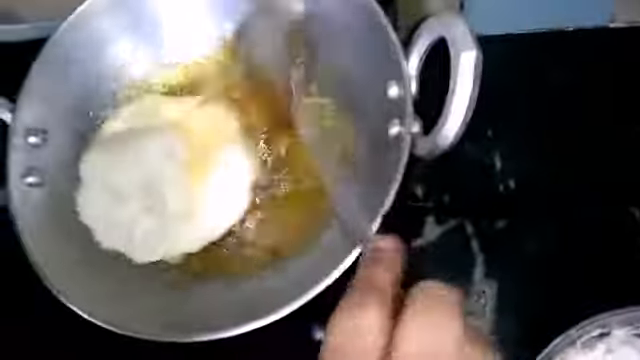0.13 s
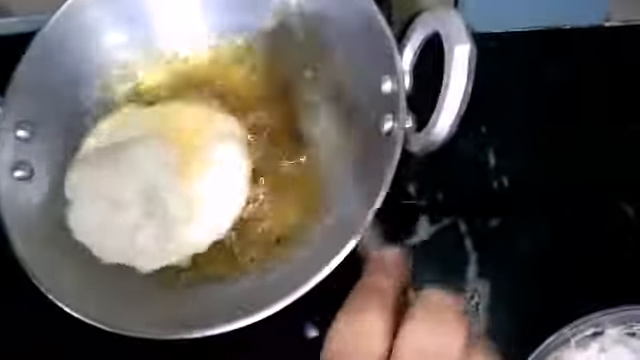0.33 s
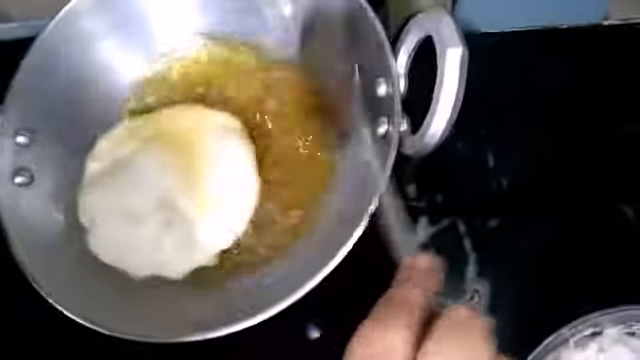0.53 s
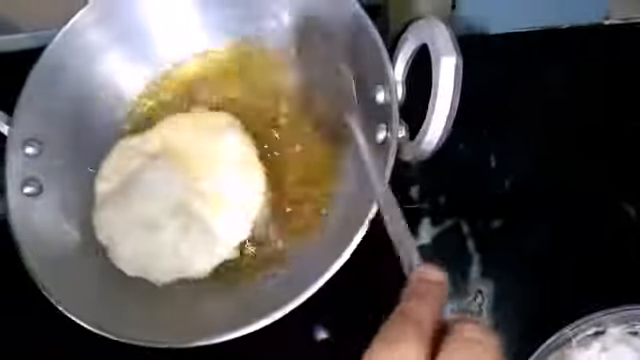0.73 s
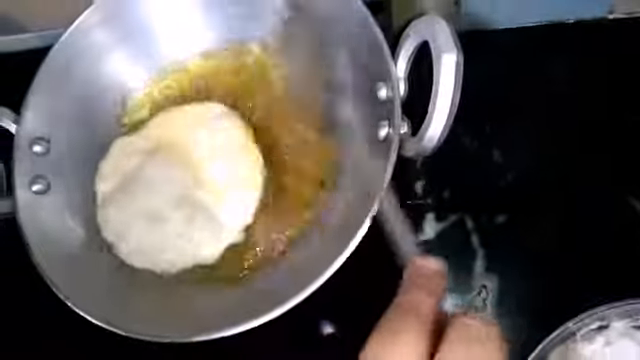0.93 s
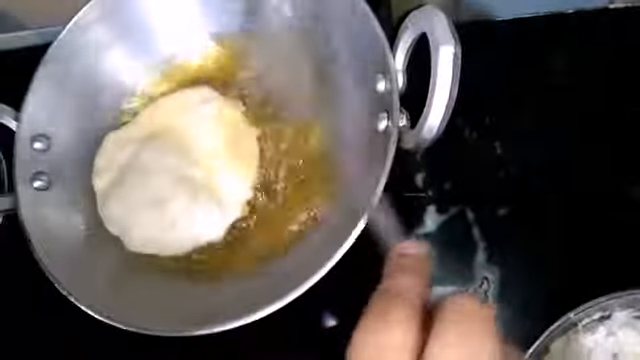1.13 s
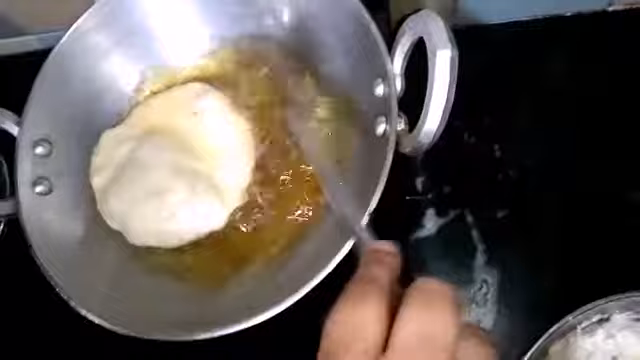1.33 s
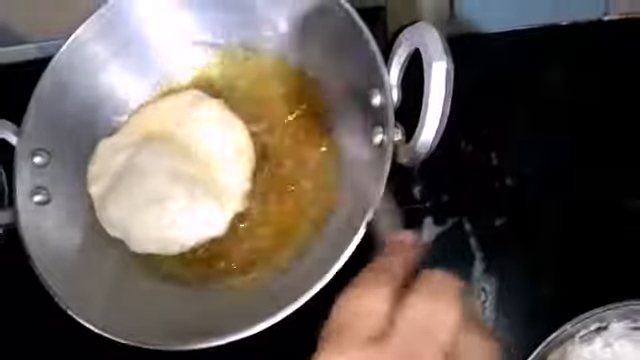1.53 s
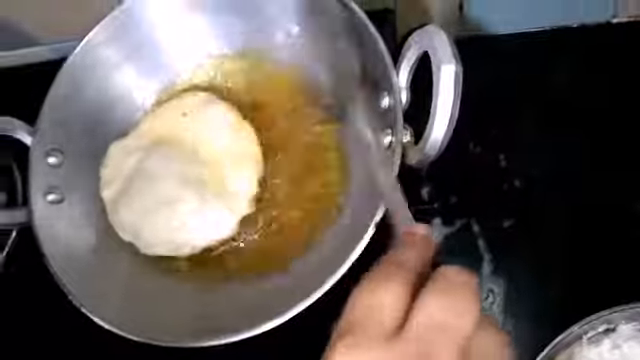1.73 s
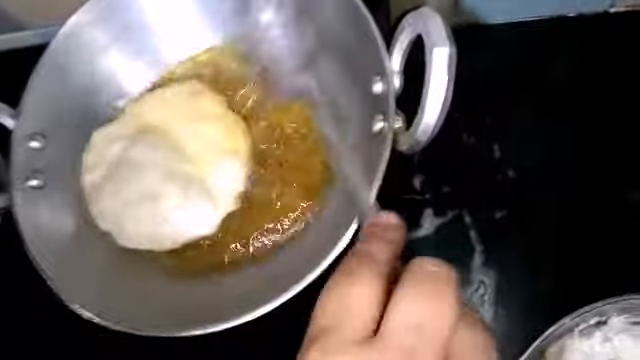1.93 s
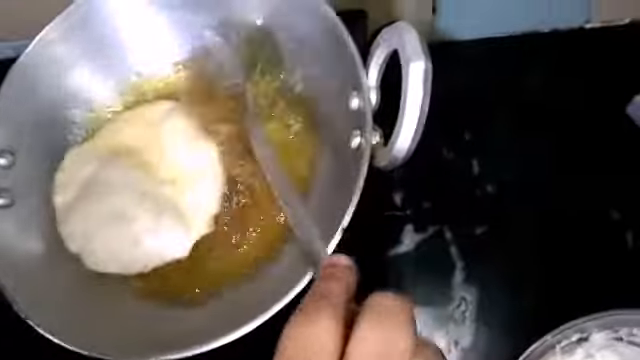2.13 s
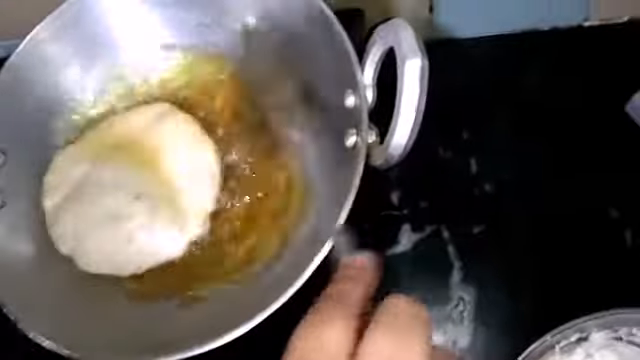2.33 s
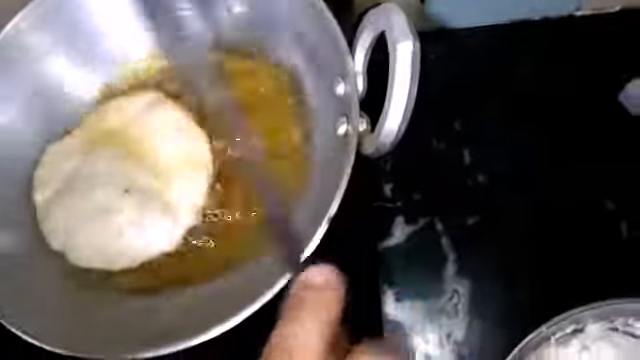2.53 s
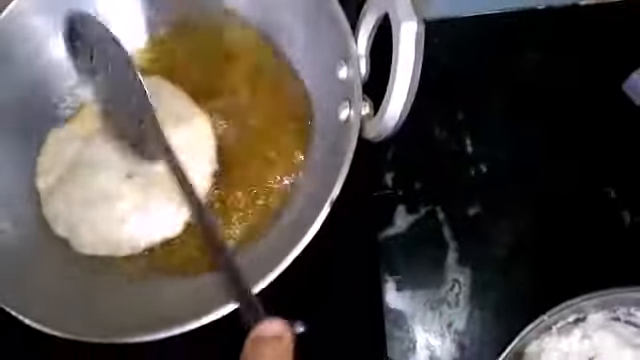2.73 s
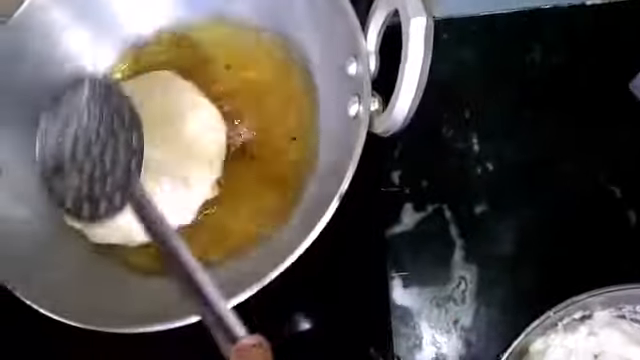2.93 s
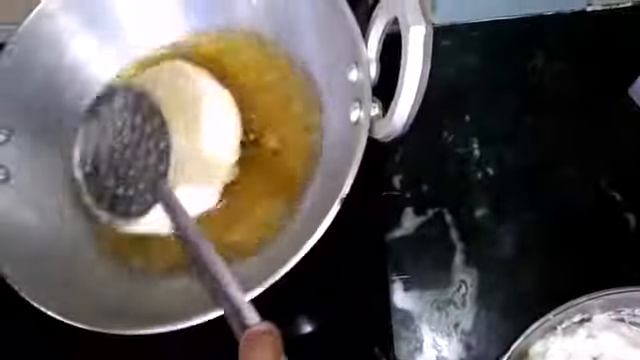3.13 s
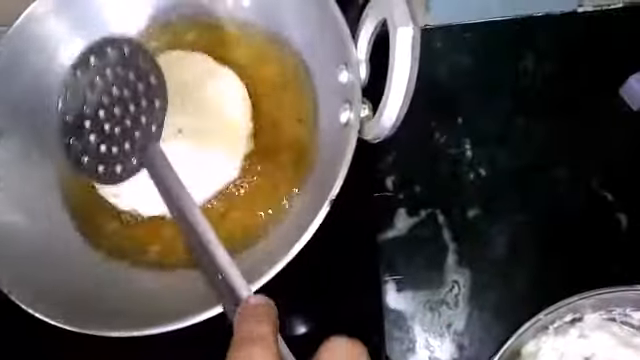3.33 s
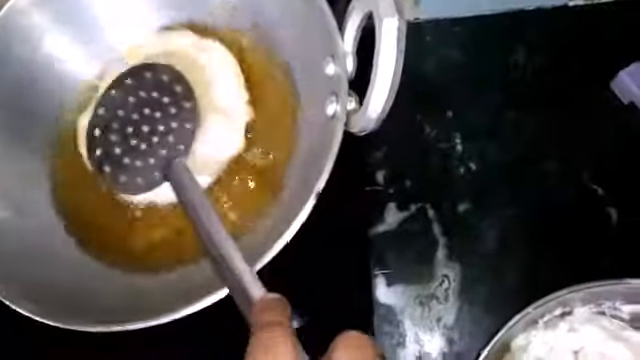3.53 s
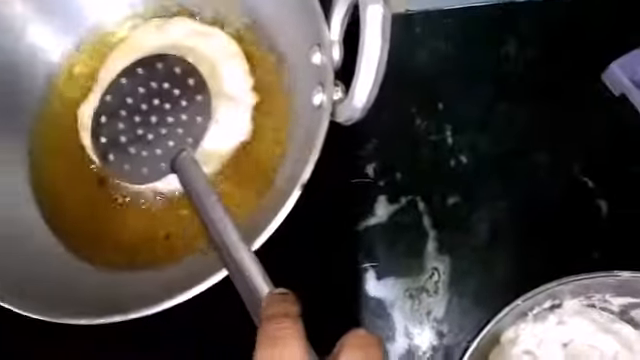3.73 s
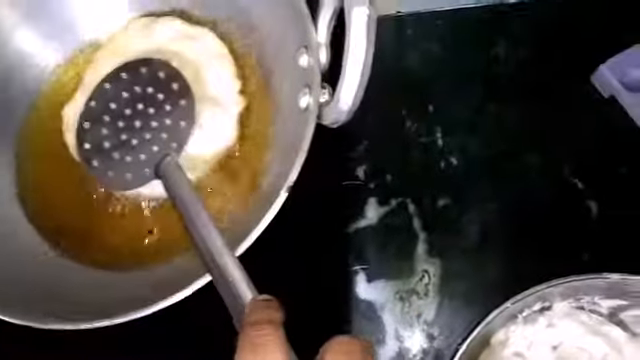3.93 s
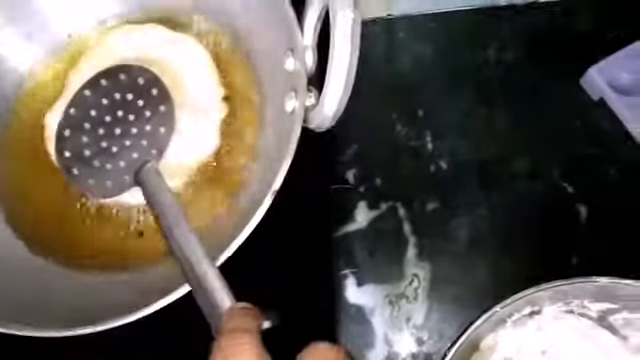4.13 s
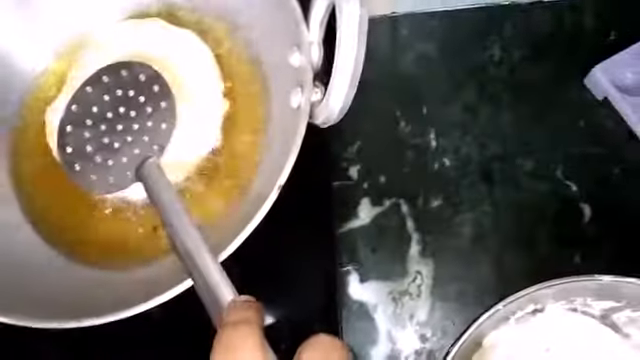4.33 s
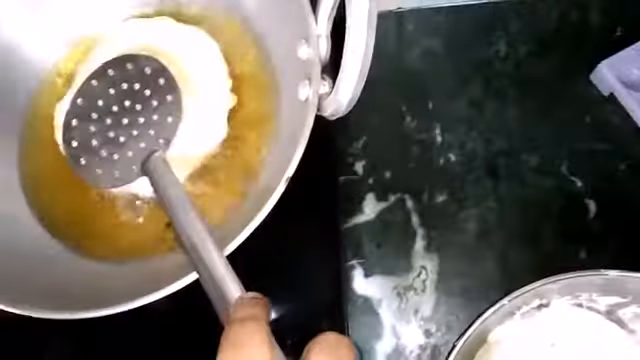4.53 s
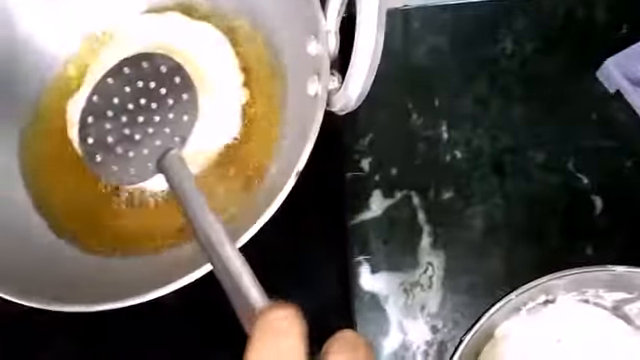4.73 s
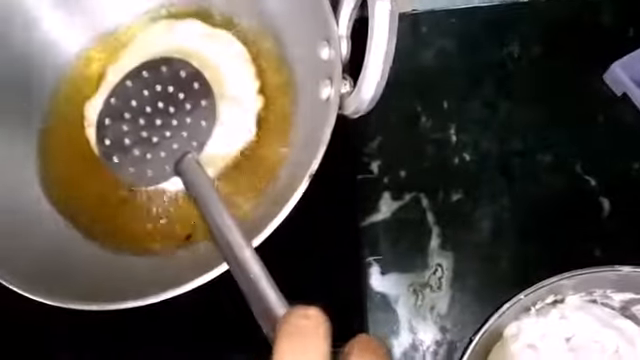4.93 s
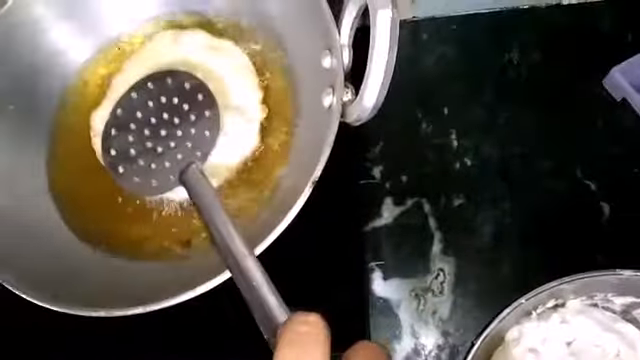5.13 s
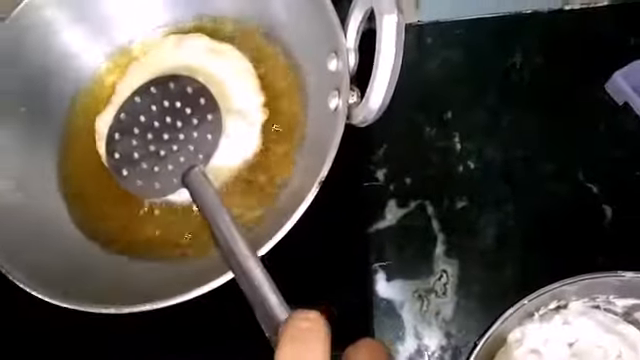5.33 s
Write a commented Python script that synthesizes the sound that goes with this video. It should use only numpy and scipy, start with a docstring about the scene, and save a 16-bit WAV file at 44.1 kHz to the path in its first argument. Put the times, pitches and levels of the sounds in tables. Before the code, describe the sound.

Close to a stove in a small kitchen, a steel skimmer raps the wall of a metal pan nine times, four a second, each clattery knock briefly ringing. Lively oil bubbles, fizzes and pops around the strokes, with tiny droplet plips. After a sharp tick the knocking stops, the sloshing fades and a calmer sizzle goes on with spits and soft gurgles. Close single-channel pickup, short hard reflections.

```python
"""A small kitchen, close to the stove: dough fries in a metal pan of hot oil.
A steel skimmer knocks nine times on the pan wall as it flicks oil at the dough, then holds the dough down.
Each knock is shaped noise plus ringing pan modes; pops and droplets are short noise puffs, and the sizzle
is swarms of tiny decaying pings over noise. Gurgles, a rumble, a low hum and a faint higher tone lie below."""
import sys
import numpy as np
from scipy import signal
from scipy.fft import rfft, irfft
from scipy.io import wavfile

SR = 44100
rng = np.random.default_rng(int(sys.argv[2]) if len(sys.argv) > 2 else 0)


def wav_out(sig):
    """Save sig, one row per channel (or a flat mono array), as 16-bit PCM at SR to the path in sys.argv[1]."""
    wavfile.write(sys.argv[1], SR, np.round(np.clip(np.atleast_2d(sig).T, -1, 1) * 32767).astype(np.int16))


N = 240812
TIME = np.arange(N) / SR  # s

# Skimmer blows on the pan wall: start_s, level_db (before the final trim), low_ring_hz, low_ring_lift_db,
# low_ring_width_octaves, high_ring_lift_db, thud_db, rebound_delay_s, rebound_db, first_mode_hz, second_mode_hz
SKIMMER_BLOWS = [(0.1722, -30.5, 1950, 8.5, 0.3, -5, 1, 0.01, -0.5, 1720, 2130),
                 (0.4312, -26, 2700, 5, 0.54, -1, -0.5, 0.018, -2.5, 2567, 5414),
                 (0.6808, -25.5, 2780, 8, 0.26, 1, -2, 0.012, -1.5, 2567, 3098),
                 (0.9146, -24.5, 1590, 10.5, 0.43, 3.5, 2.5, 0.03, -15, 1664, 1875),
                 (1.1638, -30, 1910, 12.5, 0.13, -1, -11, 0.0038, -9, 1875, 2130),
                 (1.4064, -25, 3040, 9.5, 0.13, 2.5, -2.5, 0.013, -3.5, 5090, 6265),
                 (1.6542, -21.5, 2280, 7.5, 0.1, 8, -13.5, 0.0017, -3, 5090, 7645),
                 (1.9233, -26, 1820, 8.5, 0.41, 1, -9.5, 0.0067, 1, 1875, 2234),
                 (2.2024, -27, 2360, 4.5, 0.44, 1.5, -3, 0.0059, -3, 2567, 5414)]


def skimmer():
    """Nine even strokes of steel on the pan wall, four a second."""
    out = np.zeros(N)
    for start_s, *blow in SKIMMER_BLOWS:
        add(out, start_s, knock(*blow))
    return amp(-1.0) * out


# Ringing modes of the pan, before each blow varies them: pitch_hz, level_db (relative), t60_s
PAN_MODES = [(1579, -8, .2), (1664, -7, .2), (1748, -7, .2), (1875, -10, .18), (2130, -9, .2),
             (2234, -7, .2), (2428, -8, .2), (2567, -6, .2), (2885, -8, .2), (2984, -8, .2), (3098, -6, .2),
             (5090, -4.5, .19), (5414, -3, .17), (5698, -6, .2), (6265, -5, .15), (7645, -5, .11)]
# Tone of the dense clatter: frequency_hz, density_db (relative, per Hz)
CLATTER_TONE = [(120, -35.5), (310, -6.5), (450, -17), (750, -10), (1150, -11.5), (1750, -10.5), (2700, -4),
                (3400, -14.5), (4000, -14.5), (5200, 1), (7500, -8), (10000, -13.5), (12000, -28),
                (15000, -60)]
HIGH_RING_HZ = 5270  # the bright ring that every knock shares
SING_DB, MODE_SPREAD_DB = 5.5, 2  # each blow lifts two modes; all vary a little by chance
CATCHES_PER_S, CATCH_S, SKID_S = 160, 0.00065, 0.055  # scratches as the blade skids, decay of each, of all


def knock(level_db, low_hz, low_db, low_octaves, high_db, thud_db, rebound_s, rebound_db,
          first_mode_hz, second_mode_hz, contact_s=0.0021, wet_db=0.0, modes_db=-10.0, rattle_db=-9,
          count=1764):
    """The blade chatters on the wall for a few milliseconds, rebounds, skids, and leaves the pan ringing."""
    room = tail()
    t = np.arange(len(room)) / SR
    first = t / contact_s
    second = np.maximum(t - rebound_s, 0) / contact_s
    touch = first * np.exp(-first) + amp(rebound_db) * second * np.exp(-second)
    chatter = touch * rng.standard_normal(len(t))

    # as it skids on, the blade catches in short scratches, ever more lightly
    hits = rng.random(len(t)) < CATCHES_PER_S / SR
    catches = signal.lfilter([1], [1, -np.exp(-1 / (CATCH_S * SR))], hits)
    rattle = rng.standard_normal(len(t)) * catches * np.exp(-t / SKID_S)
    contacts = chatter / np.linalg.norm(chatter) + amp(rattle_db) * rattle / np.linalg.norm(rattle)

    # the bass builds up in the room, so the first contact is thin
    rise = 1 - np.exp(-first)
    direct = colour(contacts, lambda hz: -10 * bell(hz, 420, 1.0))
    clatter = colour(direct + amp(wet_db) * room * rise, lambda hz: read(CLATTER_TONE, hz))

    # where the blade lands decides which parts of the ring speak
    ring = np.zeros(len(t))
    for hz, db, t60_s in PAN_MODES:
        sings = bell(hz, first_mode_hz, .03) + bell(hz, second_mode_hz, .03)
        mode_db = db + SING_DB * sings + MODE_SPREAD_DB * rng.standard_normal()
        decay = np.exp(-np.log(1000) * t / t60_s)
        ring += amp(mode_db) * decay * np.sin(2 * np.pi * (hz * t + rng.random()))
    ring *= rise

    def spot(hz):
        """Tone of the place that is struck: low ring, high ring and thud."""
        low_ring = low_db * bell(hz, low_hz, low_octaves)
        high_ring = high_db * bell(hz, HIGH_RING_HZ, 0.05)
        return low_ring + high_ring + thud_db * bell(hz, 393, 0.57)

    sound = colour(unit(clatter) + amp(modes_db) * unit(ring), spot)
    # the level is the rms of the first 40 ms
    return amp(level_db) * sound / np.sqrt(np.mean(sound[:count] ** 2))


def tick(s=2.5358, peak_db=-16, decay_s=0.0003, size=2048):
    """One bright, nearly dry tick of decaying noise close by as the skimmer is raised."""
    snap = rng.standard_normal(size) * np.exp(-np.arange(size) / SR / decay_s)
    snap = colour(snap, lambda hz: 45 * bell(hz, 7700, 0.74))
    out = np.zeros(N)
    add(out, s, amp(peak_db) * snap / abs(snap).max())
    return kitchen(out, wet_db=-11)


# How hard the dough fries, lively while oil is flicked over it, calmer under the skimmer,
# surging as it is pressed: time_s, level_db (before the balance of the layers)
FRYING_LEVEL = [(0, -43), (1.1, -46.5), (1.7, -44), (2.35, -45.5), (2.65, -47.5), (2.9, -47), (3.2, -49.5),
                (3.4, -47), (3.63, -50.5), (4.02, -45), (4.35, -48.5), (5, -47), (5.46, -50)]
LIVELY_DB = -44  # the level of lively frying


def frying_db():
    """How far the frying lies above or below lively, at every sample."""
    return curve(FRYING_LEVEL) - LIVELY_DB


# Tones of the three sizes of bubble, from large to small: frequency_hz, density_db (relative, per Hz)
SLOSH_TONE = [(250, -38.5), (450, -4.5), (700, -15), (1050, 0.5), (1450, -2.5), (1900, -13), (3500, -22)]
BUBBLING_TONE = [(1000, -54), (1250, -15), (1400, -4), (1700, 0), (2200, -0.5), (2600, -4), (3100, -5.5),
                 (3450, -13.5), (3900, -35), (6000, -41)]
FIZZ_TONE = [(2500, -27.5), (3750, -15), (4200, -8.5), (4700, -4.5), (5300, -1), (5900, 1), (6800, -5),
             (8000, -6), (9800, -7), (11200, -13), (12300, -21), (15500, -42)]
# Slosh of the oil, steady during the strokes, then fading, with brief swells:
# time_s, level_db (before it wavers)
SLOSH_LEVEL = [(0, -56.5), (2.55, -56.5), (2.93, -57.5), (3.15, -61.5), (3.42, -74), (3.55, -63),
               (3.7, -67), (4.05, -62), (4.3, -66.5), (5.46, -74)]
# Pitch of the commonest bubbles, lower under the skimmer: time_s, pitch_hz (before it wanders)
COMMON_PITCH = [(0, 2800), (1, 2460), (2.3, 2300), (2.9, 2100), (3.4, 1940), (4.05, 1790), (4.5, 1930),
                (5.1, 1960), (5.46, 1860)]
REST_S, SETTLE_S = 2.59, 0.36  # the skimmer comes to rest on the dough, and the oil settles
# fizz in lively frying, its dB per dB of frying, its drop in settled oil
FIZZ_DB, FIZZ_FOLLOWS, FIZZ_SETTLED_DB = -50.5, 0.063, -4


def sizzle():
    """Slosh, bubbling and fizz surge together as steam escapes from the dough; stray drops spit above."""
    vigour_db = frying_db()
    settled = 1 - np.exp(-np.maximum(TIME - REST_S, 0) / SETTLE_S)
    surge_db = .9 * drift(rate_hz=16)

    slosh = bubbles(SLOSH_TONE, 489, 1560, per_s=240, cycles=9.9, spread_db=3.0, wash_db=-4.5, wet_db=-5)
    low = slosh * amp(curve(SLOSH_LEVEL) + 2.0 * drift(rate_hz=9.9))

    body = bubbles(BUBBLING_TONE, 1385, 3506, per_s=650, cycles=6.8, spread_db=3.0, wash_db=-1, wet_db=-1)
    # the pitch of the commonest bubbles wanders from moment to moment
    wander = 2 ** (0.16 * drift(rate_hz=9.9))
    body = favour(body, curve(COMMON_PITCH) * wander)
    middle = body * amp(LIVELY_DB + vigour_db - 2.0)

    fizz = bubbles(FIZZ_TONE, 3860, 14400, per_s=2100, cycles=3.7, spread_db=3.0, wash_db=1.0, wet_db=-3)
    spits = bubbles(FIZZ_TONE, 5620, 12670, per_s=120, cycles=10, spread_db=1.0, wash_db=-18, wet_db=0)
    high_db = FIZZ_DB + FIZZ_FOLLOWS * vigour_db + FIZZ_SETTLED_DB * settled
    high = (fizz + amp(-5.5) * spits) * amp(high_db)
    return (low + middle + high) * amp(surge_db)


def bubbles(spectrum, low_hz, high_hz, per_s, cycles, spread_db, wash_db, wet_db, count=28):
    """A swarm of tiny bursting bubbles, few loud and many soft, over the noise wash of countless others."""
    swarm = np.zeros(N)
    for pitch_hz in np.geomspace(low_hz, high_hz, count):
        turns = np.arange(SR // 20) * pitch_hz / SR
        ping = np.sin(2 * np.pi * turns) * np.exp(-turns / cycles)
        chance = rng.random(N) * count * SR / per_s
        at = np.flatnonzero(chance < 1)
        strength_db = spread_db * np.minimum(-np.log(chance[at] + 1e-9), 5)
        clicks = np.zeros(N)
        clicks[at] = amp(strength_db) * (-1.) ** at  # either polarity
        swarm += pitch_hz * signal.oaconvolve(clicks, ping)[:N]

    def shape(x):
        """Gives the swarm or the wash its tone, at rms 1."""
        return unit(colour(x, lambda hz: read(spectrum, hz)))

    return unit(shape(kitchen(swarm, wet_db)) + amp(wash_db) * shape(rng.standard_normal(N)))


def favour(x, centre_hz, lift_db=5, octaves=0.15):
    """Lifts a band that follows the curve centre_hz, as the commonest bubbles stand out."""
    hz, t, z = signal.stft(x, SR, nperseg=1024)
    lift = amp(lift_db * bell(hz[:, None], np.interp(t, TIME, centre_hz), octaves))
    return unit(signal.istft(z * lift, SR, nperseg=1024)[1][:N])


# Loudest bursting bubbles, from gurgles to spits: start_s, peak_db (before dulling and reflections),
# pitch_hz, width_octaves, decay_s
BURSTS = [(0.108, -35.5, 5400, 0.051, 0.0023), (0.316, -28, 8000, 0.28, .002),
          (0.736, -41.5, 900, 0.17, 0.019), (0.995, -36, 1770, .1, 0.0066),
          (1.284, -31.5, 6500, 0.25, 0.013), (1.583, -28.5, 5140, 1, 0.0071),
          (1.604, -28, 6700, 0.42, 0.016), (1.834, -26, 5500, 0.19, 0.0037),
          (1.998, -22.5, 2380, 0.12, 0.00064), (2.008, -31.5, 2330, 0.17, 0.0045),
          (2.088, -38, 4370, .09, 0.0027), (2.136, -25, 8400, 0.26, 0.00092),
          (2.143, -29, 6000, .25, .0015), (2.168, -34, 2600, 0.14, 0.0034),
          (2.278, -29, 5400, 0.28, 0.0047), (2.3374, -31, 2350, 0.12, 0.0018),
          (2.345, -34, 4910, 0.095, 0.0033), (2.376, -31, 2180, 0.31, 0.013),
          (2.383, -31, 5770, 0.36, 0.014), (2.393, -32, 2400, 0.19, 0.0055),
          (2.436, -39, 1700, 0.19, 0.0094), (2.540, -45, 530, 0.3, 0.018), (2.597, -49, 640, 0.35, 0.013),
          (2.563, -28, 2410, 0.12, 0.0047), (2.593, -33.5, 6250, .4, .002), (2.785, -48, 890, 0.14, 0.041),
          (2.796, -36.5, 2200, 0.28, 0.009), (2.978, -33.5, 5700, 0.13, 0.0028),
          (3.170, -55.5, 604, 0.11, .067), (3.445, -40, 4450, 0.069, 0.007),
          (3.529, -45.5, 1000, 0.47, .016), (3.547, -37, 5200, 0.39, .001),
          (3.8562, -36.5, 1780, 0.12, 0.02), (4.023, -28.5, 5820, 0.22, 0.0044),
          (4.131, -39.5, 3800, 0.28, 0.012), (4.284, -35.5, 6000, 0.17, 0.0044),
          (4.324, -41, 4000, 0.079, 0.0033), (4.326, -39, 5870, 0.18, 0.036),
          (4.345, -46.5, 880, 0.049, .045), (4.524, -36, 6200, 0.29, 0.038),
          (4.6595, -27, 2094, 0.18, 0.012), (4.763, -38, 2110, 0.35, 0.0072),
          (4.773, -37, 1860, 0.036, 0.0031), (4.885, -36.5, 6260, 0.15, 0.0044),
          (4.938, -40, 6360, 0.26, 0.009), (4.959, -39, 7350, 0.23, 0.007),
          (5.003, -41.5, 2930, 0.15, 0.01), (5.050, -53, 510, 0.18, 0.042),
          (5.116, -38, 2310, 0.082, 0.004), (5.165, -32, 6130, 0.091, 0.0023),
          (5.383, -30.5, 7460, 0.11, 0.0022)]
# stray pops come by chance, more often and louder the harder the oil fries; rate and level for lively frying
STRAY_PER_S, STRAY_DB, STRAY_SPREAD_DB = 4.4, -41.5, 11.5
STRAY_LOW_HZ, STRAY_HIGH_HZ, STRAY_OCTAVES, STRAY_DECAY_S = 4080, 8700, 0.46, 0.0039


def pops(count=50):
    """Each large bubble bursts with a puff at its own pitch; small ones spit at random with the frying."""
    out, vigour_db = np.zeros(N), frying_db()
    for start_s, peak_db, pitch_hz, octaves, decay_s in BURSTS:
        add(out, start_s, puff(peak_db, pitch_hz, decay_s, octaves))

    for when, chance, smallness, strength, length in rng.random((count, 5)):
        drive = amp(.5 * vigour_db[int(when * N)])
        peak_db = STRAY_DB + STRAY_SPREAD_DB * (2 * strength - 1)
        pitch_hz = STRAY_LOW_HZ * (STRAY_HIGH_HZ / STRAY_LOW_HZ) ** smallness
        spit = puff(peak_db, pitch_hz, STRAY_DECAY_S * (.5 + length), STRAY_OCTAVES)
        if chance < drive * STRAY_PER_S * N / SR / count:
            add(out, when * N / SR, drive * spit)

    dulled = colour(out, lambda hz: -14 * bell(hz, 15700, 0.18))
    return kitchen(dulled, wet_db=-6.0)


def puff(peak_db, pitch_hz, decay_s, octaves, skirt_db=36, snap_db=13, size=8192):
    """The film snaps, and a short burst of noise follows around one pitch."""
    burst = rng.standard_normal(size) * np.exp(-np.arange(size) / SR / decay_s)
    burst[0] = amp(snap_db)

    def tone(hz):
        """A peak at the pitch, and a treble slope from an octave above it."""
        slope_db = 20 * np.log10(1 + (hz / (2 * pitch_hz)) ** 2)
        return skirt_db * bell(hz, pitch_hz, 2 * octaves) - slope_db

    burst = colour(burst, tone)
    return amp(peak_db) * burst / abs(burst).max()


# flicked oil falls back as droplets: level and its spread, mean fall time
DROP_DB, DROP_SPREAD_DB, DROP_FALL_S = -47, 1.5, 0.095
# middle pitch, range either way, width of each plip, its decay
DROP_HZ, DROP_RANGE_OCTAVES, DROP_OCTAVES, DROP_DECAY_S = 2410, 0.75, 0.068, 0.0014


def droplets(count=4):
    """A few drops land in the oil after each stroke, each with a plip of its own pitch."""
    out = np.zeros(N)
    for stroke_s, *_ in SKIMMER_BLOWS:
        for delay, strength, pitch in 2 * rng.random((count, 3)) - 1:
            peak_db = DROP_DB + DROP_SPREAD_DB * strength
            pitch_hz = DROP_HZ * 2 ** (DROP_RANGE_OCTAVES * pitch)
            plip = puff(peak_db, pitch_hz, DROP_DECAY_S, DROP_OCTAVES)
            add(out, stroke_s + DROP_FALL_S * (1 + delay / 2), plip)
    return kitchen(out, wet_db=-4)


def crackle(level_db=-62, per_s=45, spread_db=8.5):
    """The smallest drops of water snap on the surface as ticks, louder when the frying is lively."""
    chance = rng.random(N) * SR / per_s
    ticks = (chance < 1) * amp(spread_db * np.clip(-np.log(chance + 1e-9), 0, 3))
    ticks = kitchen(ticks, wet_db=6)
    ticks = unit(colour(ticks, lambda hz: read(FIZZ_TONE, hz) - 30 * bell(hz, 300, 1.6)))
    return ticks * amp(level_db + 1.0 * frying_db())


# Soft low bumps: start_s, peak_db (before reflections), pitch_hz
LOW_BUMPS = [(0.117, -47, 173), (2.545, -45.5, 169), (2.613, -49, 183), (3.485, -54, 169.5),
             (3.705, -49, 180), (3.839, -50, 200), (4.033, -47.5, 197), (4.109, -53.5, 249),
             (4.466, -51.5, 175), (4.535, -50, 252), (5.201, -54, 202)]
BUMP_S = 0.0038  # a bump swells for this long, then fades


def bumps(size=8192):
    """A few dull, round bumps, each a low sine that swells and fades, all of one length."""
    out, t = np.zeros(N), np.arange(size) / SR
    swell = t / BUMP_S * np.exp(1 - t / BUMP_S)
    for start_s, peak_db, pitch_hz in LOW_BUMPS:
        add(out, start_s, amp(peak_db) * swell * np.sin(2 * np.pi * pitch_hz * t))
    return kitchen(out, wet_db=-0.5)


# Tone of the low rumble of stove and kitchen, also of the gurgle: frequency_hz, density_db (relative, per Hz)
RUMBLE_TONE = [(20, -17), (70, -4), (110, 2.5), (150, 0), (240, 3.5), (290, -7.5), (340, -16), (480, -11.5),
               (600, 0), (770, 2), (870, -8), (970, -30), (1500, -32.5)]


def gurgle(level_db=-65):
    """Big steam bubbles roll out from under the dough, one low note each."""
    rolling = bubbles(RUMBLE_TONE, 122, 906, per_s=55, cycles=1.9, spread_db=3.5, wash_db=-10, wet_db=-7.5)
    return amp(level_db) * rolling


# Strength of the low rumble: time_s, level_db
RUMBLE_STRENGTH = [(0, -60), (1, -61), (3.3, -62), (5.46, -58)]
# Low hum, and a faint wavering tone near 742 Hz: pitch_hz, level_db (before it wavers), waver_hz
WAVERING_TONES = [(48, -79.5, 0.26), (96.5, -65, 0.77), (146.5, -72.5, 0.81), (742, -73, 0.75)]


def stove():
    """Fluttering noise makes a low rumble; sines that waver in pitch and strength make the hum and tone."""
    flutter = rng.standard_normal(N) * amp(2.1 * drift(rate_hz=40))
    rumble = unit(colour(flutter, lambda hz: read(RUMBLE_TONE, hz)))
    tones = np.zeros(N)
    for pitch_hz, level_db, waver_hz in WAVERING_TONES:
        strength = amp(level_db + 3.85 * drift(rate_hz=12))
        turns = np.cumsum(pitch_hz + waver_hz * drift(rate_hz=13.0)) / SR
        tones += strength * unit(np.sin(2 * np.pi * turns))
    return rumble * amp(curve(RUMBLE_STRENGTH)) + tones


# How long sound hangs in the kitchen: frequency_hz, t60_s
KITCHEN_DECAY = [(300, 0.28), (1000, 0.38), (2300, 0.29), (5400, 0.21), (8000, 0.17), (13000, 0.1)]


def tail(size=16384):
    """Dense reflections of energy 1, noise whose bands each die at their own speed."""
    hz, t, z = signal.stft(rng.standard_normal(size), SR, nperseg=256)
    fade = amp(-60 * t / read(KITCHEN_DECAY, hz)[:, None])
    out = signal.istft(z * fade, SR, nperseg=256)[1][:size]
    return out / np.linalg.norm(out)


def kitchen(x, wet_db):
    """The direct sound and its reflections from pan and walls."""
    return x + amp(wet_db) * signal.oaconvolve(x, tail())[:len(x)]


def amp(db):
    """Decibels to gain."""
    return 10 ** (np.asarray(db) / 20)


def unit(x):
    """Scales to rms 1."""
    return x / np.sqrt(np.mean(x ** 2) + 1e-20)


def curve(points):
    """Draws a table of (time, value) as a line through the whole scene."""
    return np.interp(TIME, *np.transpose(points))


def read(points, hz):
    """Reads a table along a log-frequency axis."""
    f, value = np.transpose(points)
    return np.interp(np.log(hz + 1), np.log(f + 1), value)


def add(mix, s, sound):
    """Lays a sound into the mix at time s."""
    part = mix[max(round(s * SR), 0):][:len(sound)]
    part += sound[:len(part)]


def bell(hz, centre_hz, octaves):
    """A bump of height 1 on the log-frequency axis."""
    return np.exp(-.5 * (np.log2((hz + 1) / centre_hz) / octaves) ** 2)


def colour(x, db_at, size=4096):
    """Causal minimum-phase filter whose gain in dB is db_at(Hz)."""
    log_gain = np.log(amp(db_at(abs(np.fft.fftfreq(size, 1 / SR)))))
    taps = np.fft.ifft(np.exp(np.conj(signal.hilbert(log_gain)))).real
    return signal.oaconvolve(x, taps[:size // 2])[:len(x)]


def drift(rate_hz):
    """Slow random motion of rms 1, weaker above the given rate."""
    hz = np.fft.rfftfreq(N, 1 / SR)
    return unit(irfft(rfft(rng.standard_normal(N)) * (hz > 0) / (1 + (hz / rate_hz) ** 2), N))


# Fixed peaks and dips in the tone: centre_hz, width_octaves, gain_db
PEAKS_AND_DIPS = [(382, 0.11, -4.5), (577.8, 0.031, 8), (672, 0.065, -7), (985, 0.069, -7.5),
                  (1205, 0.026, -8), (1524, 0.033, -9.5), (3920, 0.018, -5.5)]


def scene():
    """Everything at the pan, coloured by fixed peaks and dips, in one channel."""
    strokes = skimmer() + tick() + droplets()
    oil = sizzle() + pops() + crackle() + gurgle()
    mix = strokes + oil + bumps() + stove()

    def tone(hz):
        """Summed gain in dB of the peaks and dips."""
        return sum(db * bell(hz, centre_hz, octaves) for centre_hz, octaves, db in PEAKS_AND_DIPS)

    return colour(mix, tone, size=8192)[None]


EDGE_HZ = 15600


def record(dry):
    """A steep linear-phase low-pass ends the treble at the edge."""
    taps = signal.firwin(511, EDGE_HZ, window=("kaiser", 9), fs=SR)
    return signal.oaconvolve(dry, taps[None], "same")


dry = scene()
out = record(dry)
wav_out(out)
```